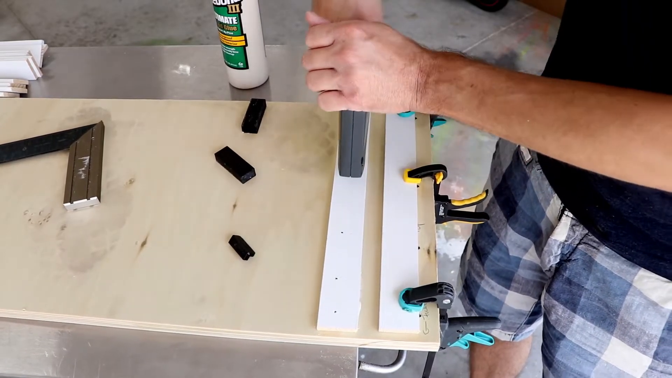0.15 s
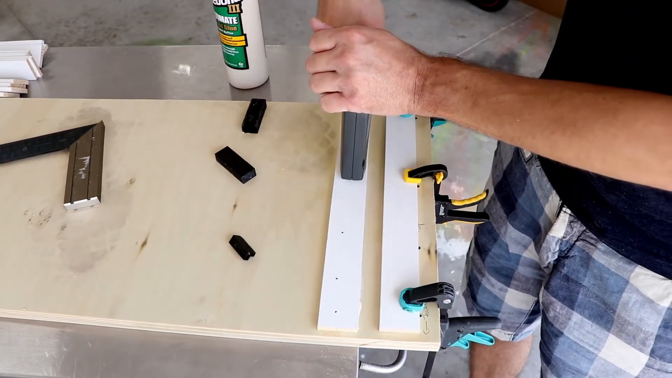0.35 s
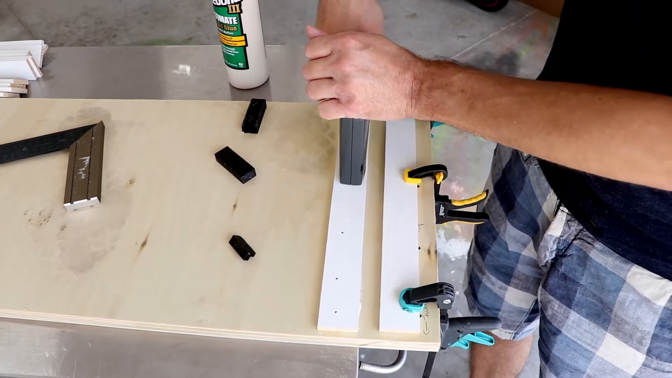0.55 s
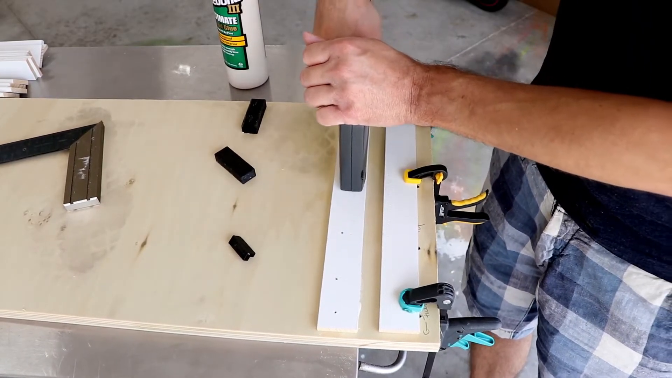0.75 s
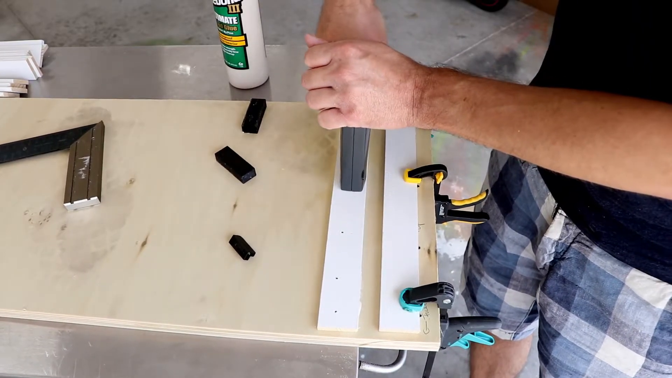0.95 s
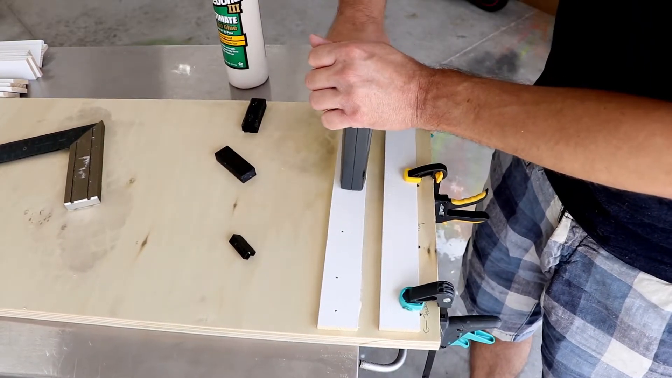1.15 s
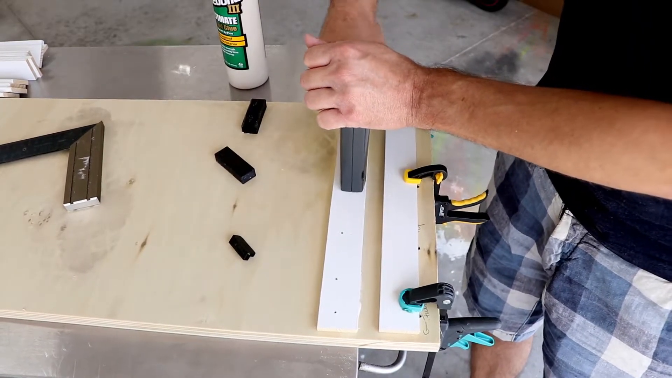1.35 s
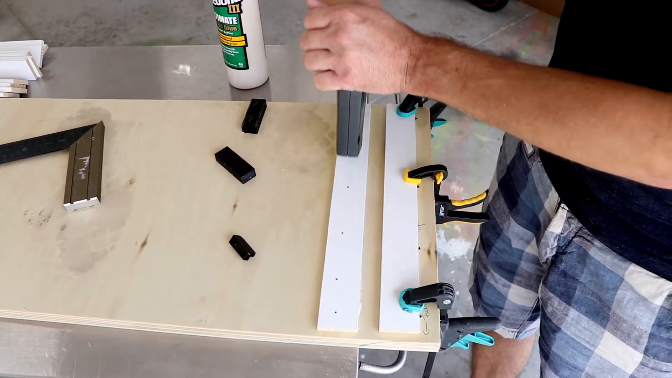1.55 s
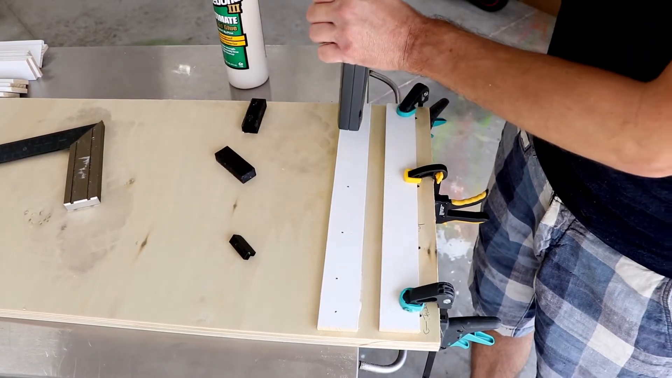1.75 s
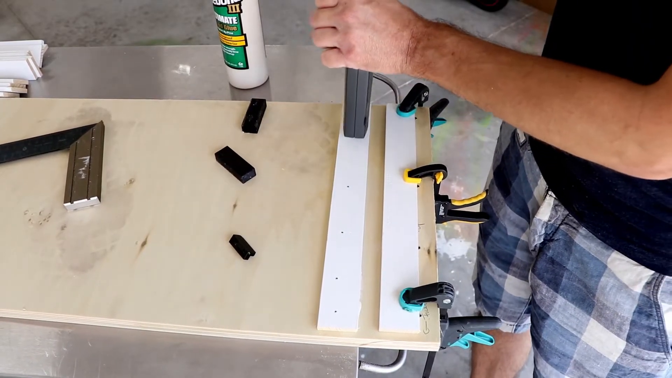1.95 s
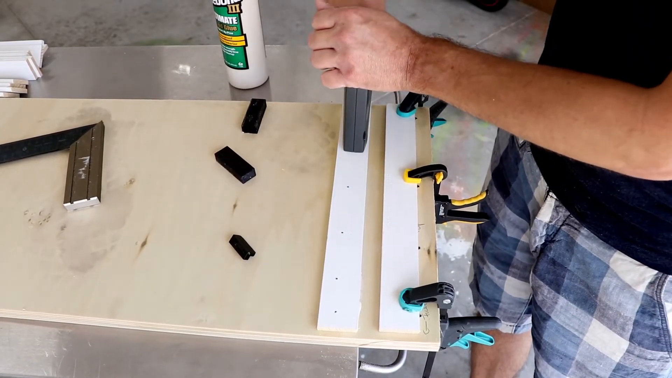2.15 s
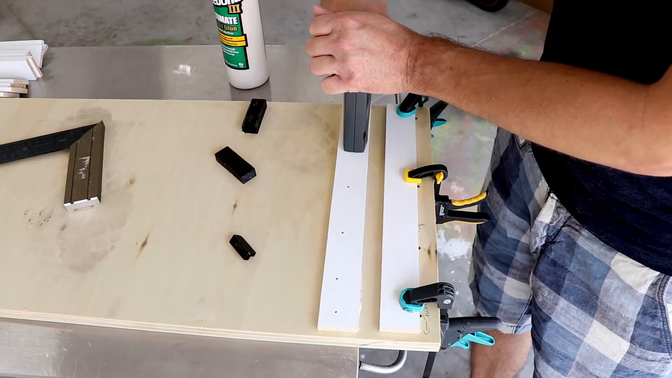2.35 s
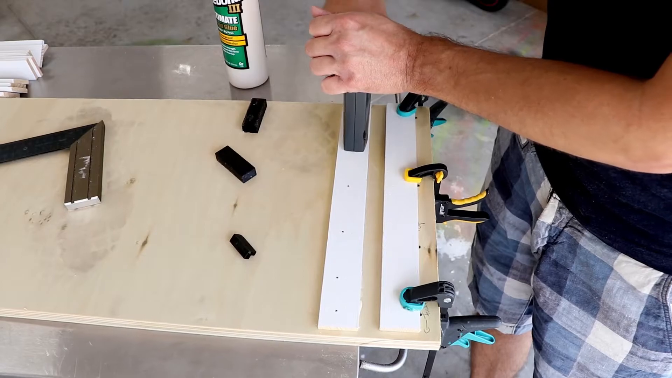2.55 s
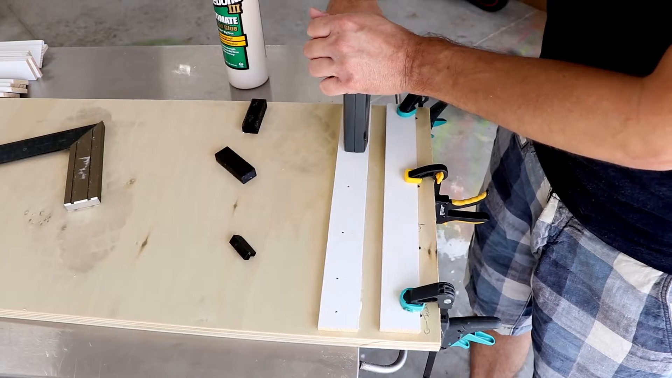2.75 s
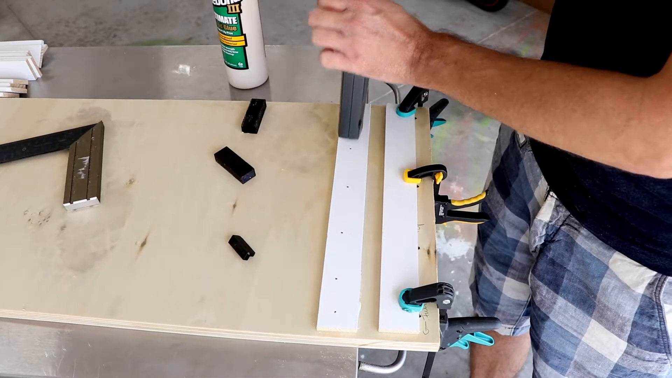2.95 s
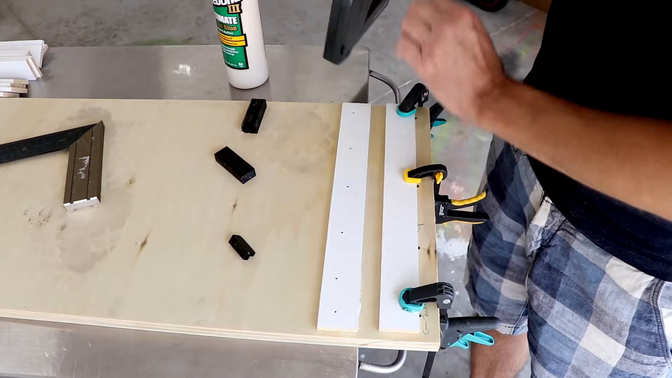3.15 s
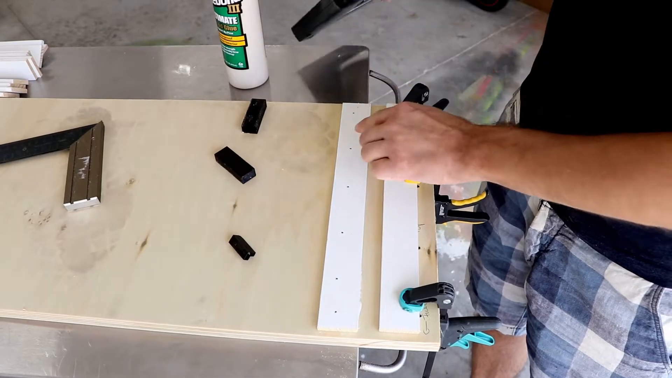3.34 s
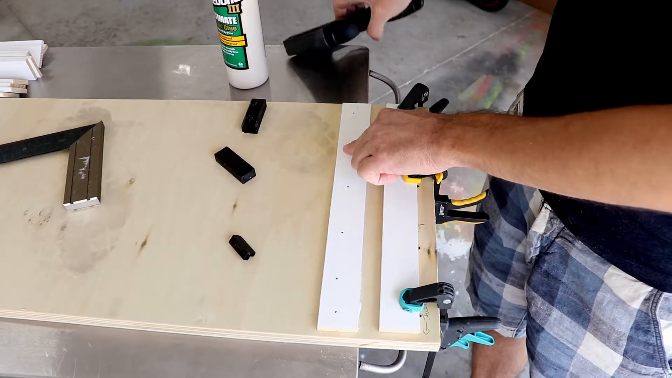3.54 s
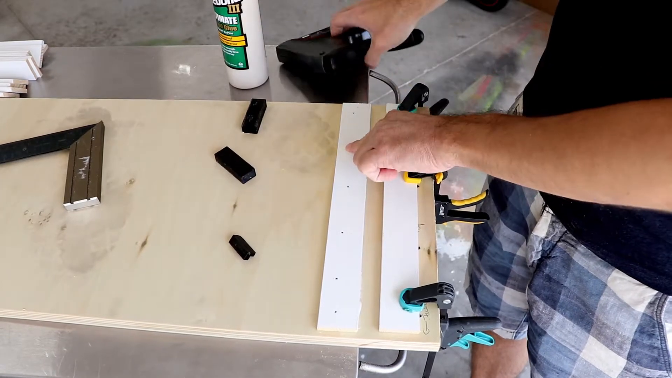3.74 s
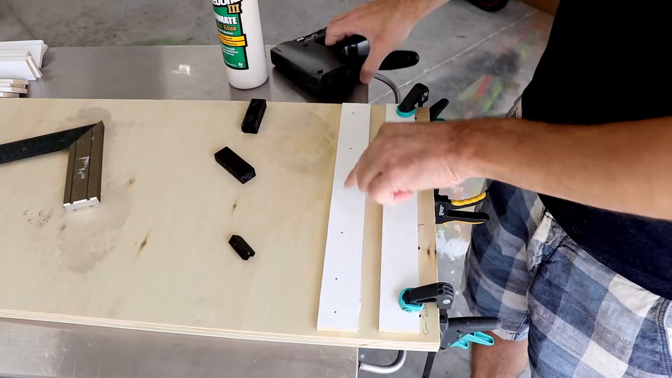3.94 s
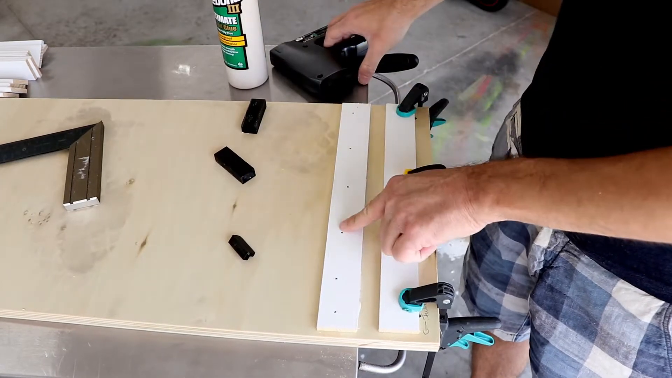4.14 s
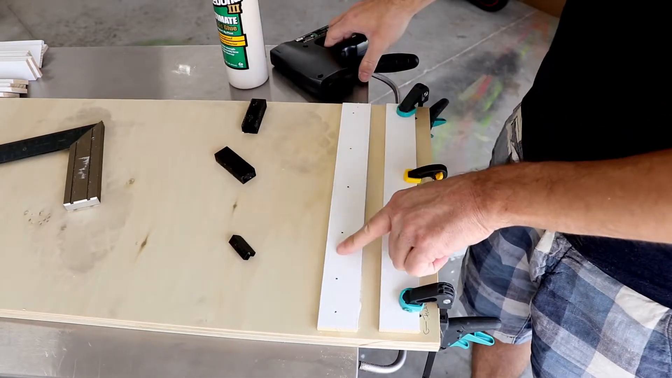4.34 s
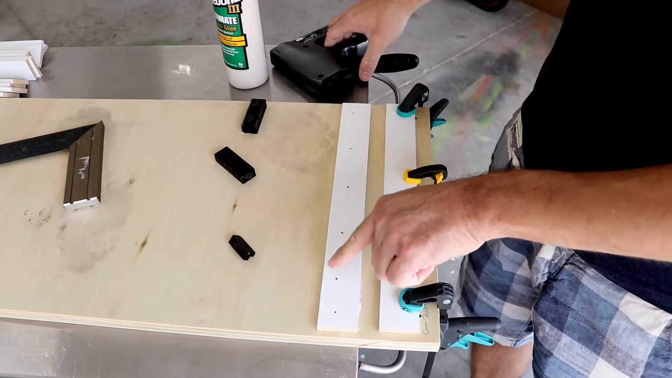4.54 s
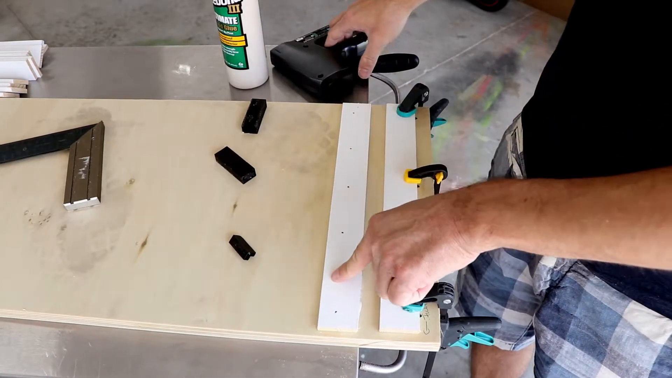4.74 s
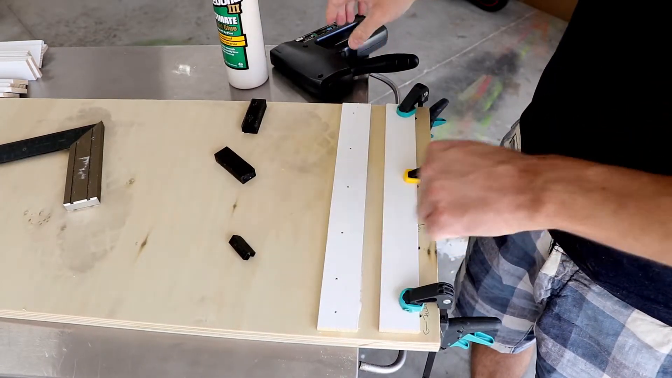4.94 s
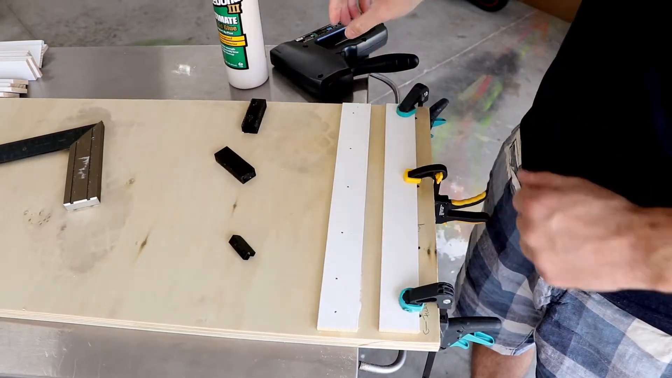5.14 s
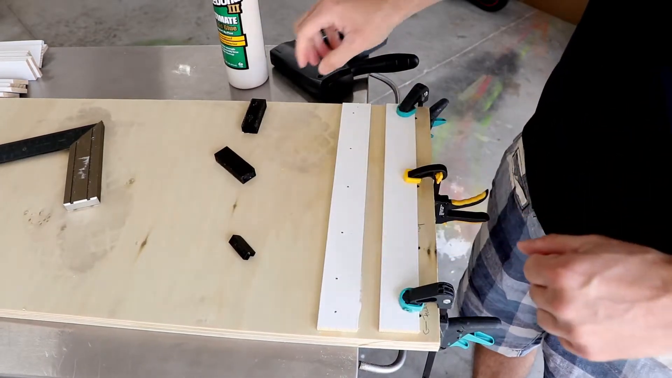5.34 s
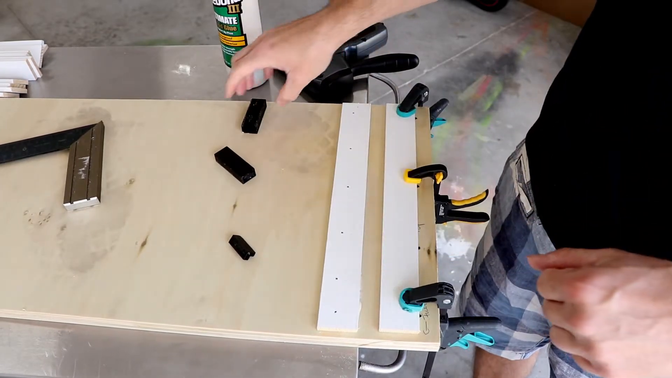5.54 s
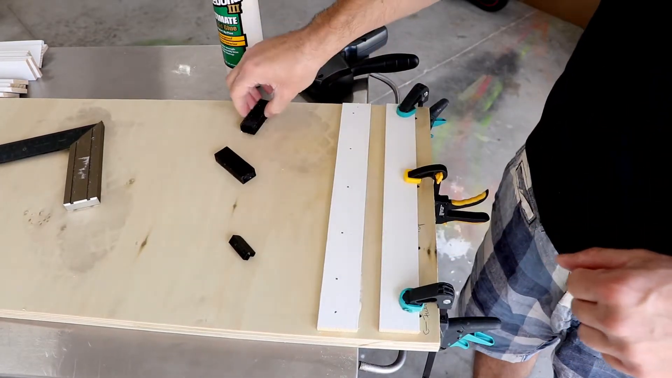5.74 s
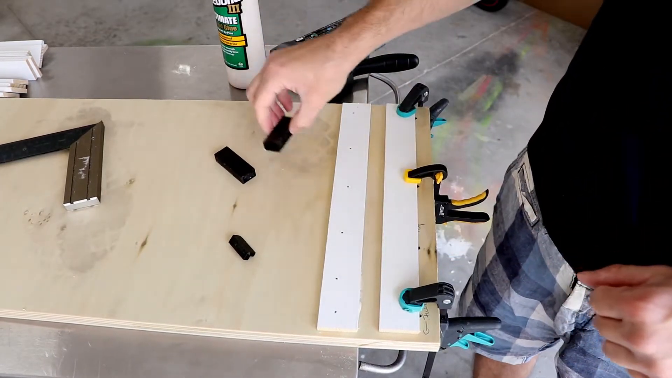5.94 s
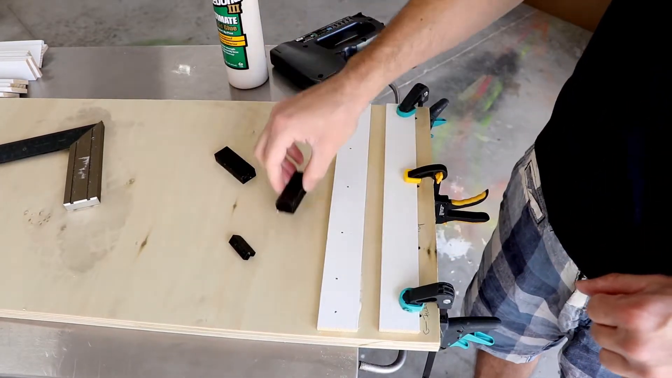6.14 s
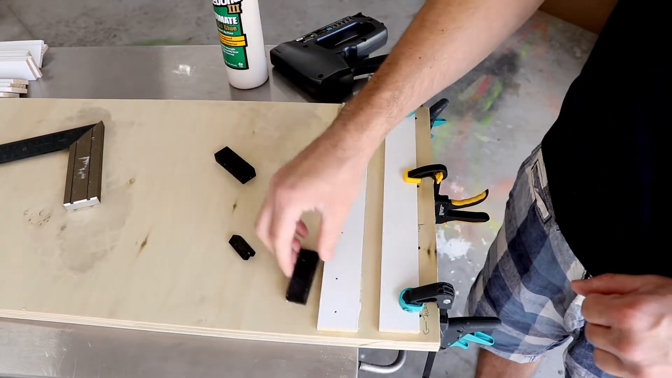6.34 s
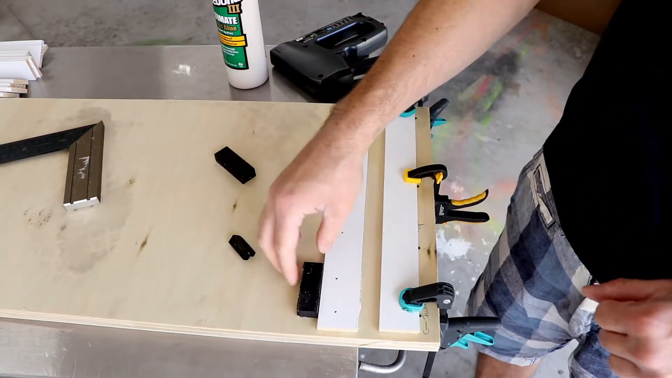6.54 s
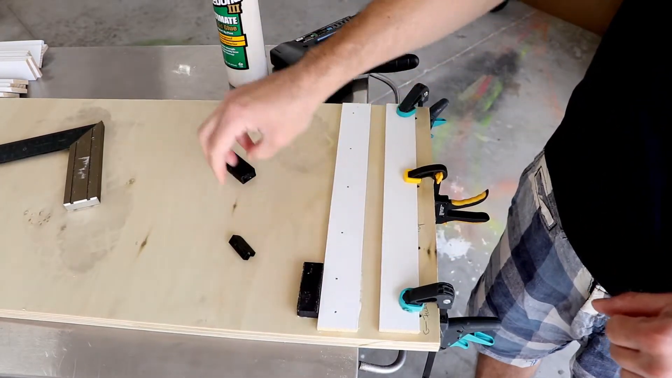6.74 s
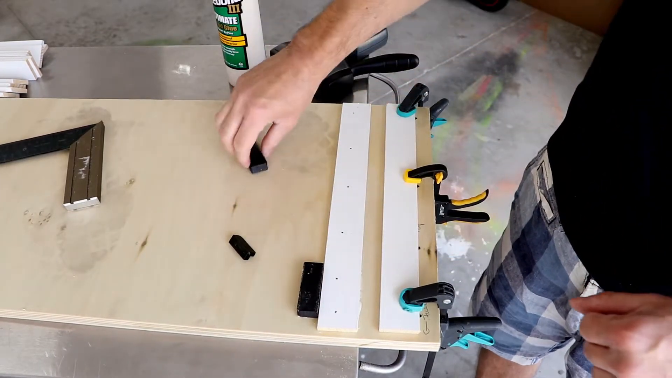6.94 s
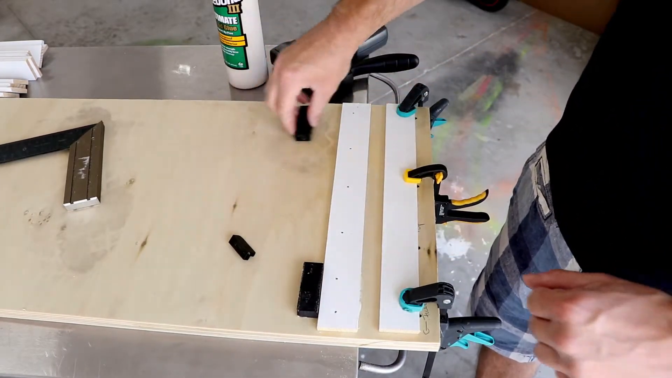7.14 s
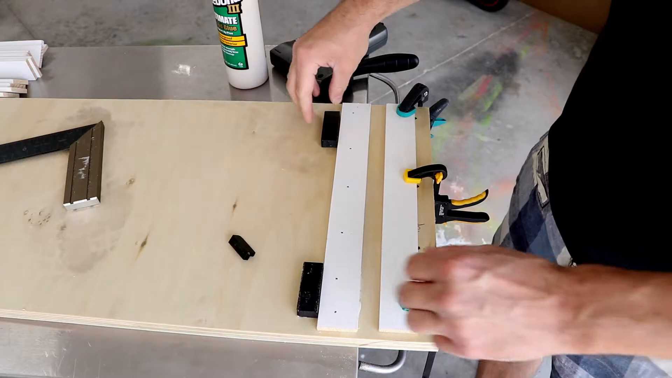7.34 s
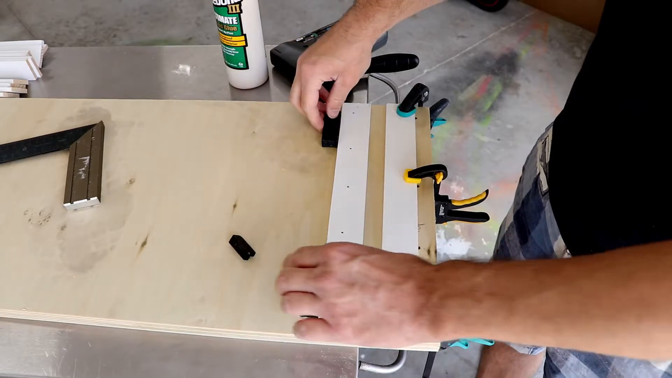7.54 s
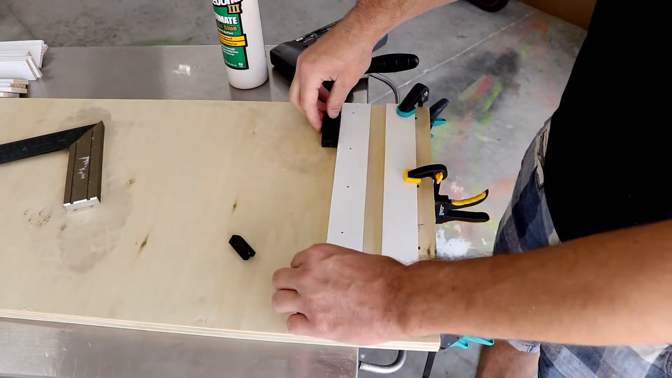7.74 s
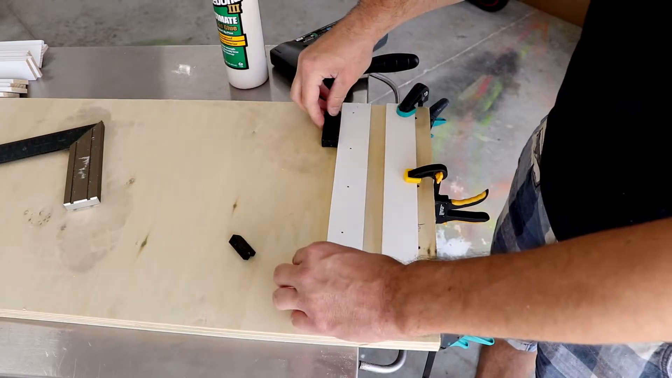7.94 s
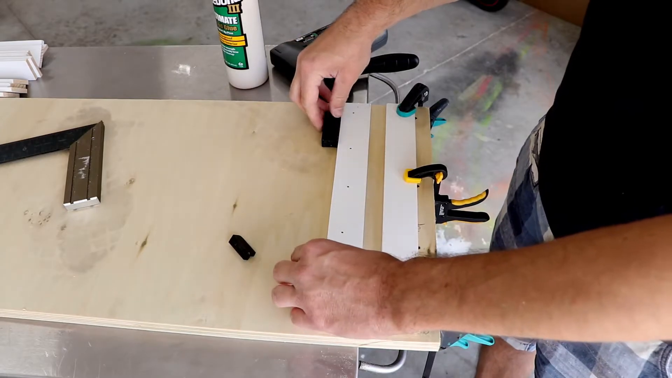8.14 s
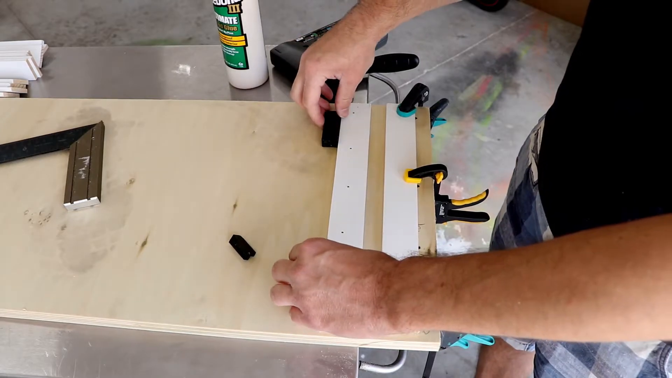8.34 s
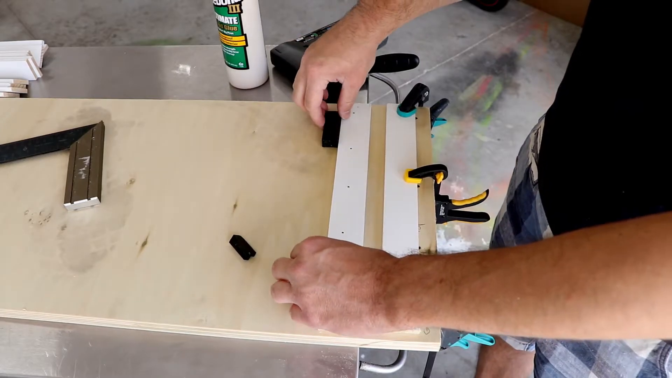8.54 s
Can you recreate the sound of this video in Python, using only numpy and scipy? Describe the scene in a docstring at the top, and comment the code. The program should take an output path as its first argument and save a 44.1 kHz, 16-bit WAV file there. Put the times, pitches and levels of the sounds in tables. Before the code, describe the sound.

Two deafening electric staple gun shots crack and ring through a bare garage, then the gun clunks onto steel and small blocks tap on plywood.

```python
"""The dying ring of a staple shot opens the scene; two more shots follow, so close that the camera overloads.
An electric staple gun drives staples into slats clamped on plywood in a bare garage: filtered noise bursts
crack and decaying sine modes ring the sheet-metal bench. The gun ticks, bumps the work and is laid on the
steel; rubs are gritty noise, squeaks wavering tones, block taps short resonant bursts.
Decaying noise echoes every blow; machines hum faintly in the air."""
import sys
import numpy as np
from scipy import signal
from scipy.fft import rfft, irfft, next_fast_len
from scipy.io import wavfile
from scipy.ndimage import uniform_filter1d, map_coordinates

SR = 44100
rng = np.random.default_rng(int(sys.argv[2]) if len(sys.argv) > 2 else 0)


def int16_out(signal):
    """Quantize to a 16-bit WAV file."""
    q = np.round(np.clip(np.atleast_2d(signal).T, -1, 1) * 32767)
    wavfile.write(sys.argv[1], SR, q.astype(np.int16))


N = 383229
LEAD = SR // 2  # samples before the start, for the shot that is still ringing


def amp(db):
    """Level: decibels to an amplitude ratio."""
    return 10 ** (np.asarray(db) / 20)


def unit(x):
    """Normalisation: scales a signal to an rms of 1."""
    return x / np.sqrt(np.mean(x ** 2) + 1e-20)


def along(points, hz):
    """Spectral envelope: interpolates (frequency, value) points on a log frequency axis."""
    f, v = np.transpose(points)
    return np.interp(np.log(hz + 1), np.log(f + 1), v)


def filtered(x, response):
    """Linear filtering: multiplies the spectrum by a response of frequency."""
    m = next_fast_len(x.shape[-1] + 2048)
    spectrum = rfft(x, m) * response(np.fft.rfftfreq(m, 1 / SR))
    return irfft(spectrum, m)[..., :x.shape[-1]]


def peaks(table, widen, base_db):
    """Resonance: the powers of a body's modes add over a flat base; widen scales every width."""
    def gain(f):
        power = sum(amp(db) ** 2 / (1 + (2 * (f - c) / (widen * w)) ** 2) for c, w, db in table)
        return np.sqrt(amp(base_db) ** 2 + power)
    return gain


def wobble(rate):
    """Slow random modulation: a smooth curve through rate random knots a second."""
    coarse = np.arange(0, N + 64, 64)
    knots = rng.standard_normal(int(N * rate / SR) + 4)
    return np.interp(np.arange(N), coarse, map_coordinates(knots, [coarse * rate / SR]))


# Likeness of the left and right noise.
# Columns: frequency_hz, correlation (no unit)
ALIKE = [(25, .1), (60, .75), (130, .93), (290, 0.84), (640, 0.97), (1400, 0.11), (3000, 0.14)]


def pair(count):
    """Interchannel coherence: two noises, alike in the bass and nearly unrelated in the treble."""
    def split(hz):
        turn = np.arccos(np.clip(along(ALIKE, hz), -1, 1)) / 2
        return [np.cos(turn), np.sin(turn)]
    mid, side = filtered(rng.standard_normal((2, count)), split)
    return np.array([mid + side, mid - side])


def burst(colour, rise, hold, length, focus):
    """Impact noise: a coloured crack rises, holds, then falls 20 dB per length (all in s).

    Focus is the share that left and right have in common."""
    t = np.arange(SR // 12) / SR
    noise = unit(filtered(pair(count=len(t)), colour))
    noise = unit(focus * noise[0] + (1 - focus) * noise)
    swell = np.minimum(t / max(rise, 1e-4), 1)
    decay = amp(-20 * np.maximum(t - rise - hold, 0) / max(length, 5e-4))
    return noise * swell * decay / 2  # peak about 1


# How fast the room dies away.
# Columns: frequency_hz, t60_s
GARAGE = [(100, 2.5), (260, 0.83), (700, 0.57), (1840, 0.48), (4850, 0.46), (12800, 0.33)]
# Colour of the echo from the walls.
# Columns: frequency_hz, level_db
WALLS = [(110, -22), (200, -0.5), (400, -6), (900, 1), (2000, 3.5), (4200, -1.5), (5000, -2.5), (9000, 3),
         (15000, -0.5)]


def garage(seconds):
    """Reverberation: a noise tail builds up, then each frequency dies at its own speed; left energy is 1."""
    hz, t, z = signal.stft(pair(count=int(SR * seconds)), SR, nperseg=256)
    fall_db = 60 * t / along(GARAGE, hz)[:, None]
    linger = amp(-25 - 0.37 * fall_db) * (1 - t / t[-1])  # the far end of the room, faintly
    decay = amp(-fall_db) + linger
    tail = signal.istft(z * amp(along(WALLS, hz))[:, None] * decay, SR, nperseg=256)[1]
    tail = tail * np.clip((np.arange(tail.shape[1]) / SR - .002) / 0.003, 0, 1)
    return tail / np.linalg.norm(tail[0])


# Modes of the plywood and sheet-metal bench, levels before tilt and scatter.
# Columns: pitch_hz, level_db, t60_s
BENCH = [(88, -22, .2), (161, -15.5, 0.22), (206, -9.5, 0.6), (214.6, -24.5, 3.5), (286.7, -7, .5),
         (340.3, -0.5, 0.24), (368, -22.5, 1.1), (401, 4.5, 0.09), (451.3, -5, .3), (472, -22, 1.1),
         (539.6, -5.5, 0.2), (750.2, -10, 0.17), (970, -28, 0.95)]


def bench(tilt, seconds, scatter_db, flutter, slap_db, attack):
    """Modal vibration: a dull slap, then modes of random strength flutter as close neighbours beat with them."""
    t = np.arange(int(SR / 5 * seconds)) * 10 / SR  # at a tenth of the rate, twice as long as seconds
    hz, db, t60 = np.transpose(BENCH)[:, :, None]
    knots = rng.standard_normal((3, len(BENCH), 61))
    drift = np.array([[np.interp(t * 30, np.arange(61), k) for k in mode] for mode in knots[:2]])
    drift = drift * np.minimum(t / 0.039, 1)
    strength_db = db + tilt * np.log2(hz / 400) + scatter_db * knots[2, :, 1:2]
    size = amp(strength_db + 3.5 * flutter * drift[0] - 60 * t / t60)
    apart = 0.18 * knots[2, :, 2:3]  # each mode reaches left and right a little apart
    flip = np.pi * (knots[2, :, 3:4] > 0)  # random polarity
    phase = 2 * np.pi * hz * t + flip + flutter * drift[1]
    ring = np.array([(size * np.sin(phase + side * apart)).sum(axis=0) for side in (1, -1)])
    period = 2 ** (-tilt / 8) / 480
    slap = amp(slap_db) * t / period * np.exp(-1.6 * t / period) * np.sin(2 * np.pi * t / period)
    # the high modes are too dense to tell apart: a band of noise
    band = signal.butter(1, (900, 1350), "band", fs=SR / 10, output="sos")
    sheet = signal.sosfilt(band, rng.standard_normal((2, len(t))))
    sheet = sheet * amp(2.7 * tilt - 10.5 - 60 * t / 1.1)
    knock = ((ring + sheet) * (1 - np.exp(-t / attack)) + slap) / 3
    return signal.resample_poly(knock, 10, 1, axis=1)


def add(out, s, x):
    """Superposition: mixes a stereo sound in at time s."""
    part = out[:, round(s * SR) + LEAD:][:, :x.shape[1]]
    part += x[:, :part.shape[1]]


def blows(rows, colour, knock, rise, hold, focus, wet_db, knock_wet_db):
    """Impact excitation: each contact is a crack and a knock, both answered by the room.

    Rows: start_s, level_db, knock_db over the crack, tilt and knock tilt (dB per octave), length_s, pan_db."""
    out = np.zeros((2, N + LEAD))
    for s, db, knock_db, tilt, knock_tilt, length, pan in rows:
        tint = lambda hz: colour(hz) * amp(tilt * np.log2((hz + 100) / 4000))
        crack = amp(db) * burst(tint, rise, hold, length, focus)
        seconds = np.clip(1 + (db + max(knock_db, 0)) / 50, .22, 1)  # faint blows sink into the air sooner
        thud = amp(db + knock_db) * knock(knock_tilt, seconds)
        add(out, s, crack * amp([[pan / 2], [-pan / 2]]))
        add(out, s, thud)
        room = garage(seconds)
        echo = filtered(room, tint)  # the walls smooth the crack into its mean colour
        echo_gain = amp(wet_db) * np.linalg.norm(crack[0]) / np.linalg.norm(echo[0])
        add(out, s, echo_gain * echo)
        start = thud[:1, :2000] * np.hanning(4000)[2000:]  # only the knock's onset excites the room
        add(out, s, amp(knock_wet_db) * signal.fftconvolve(start, room, axes=1))
    return out[:, LEAD:]


# Staple shots, start_s when the blade lands; leads are times before that, knock_db is over the crack.
# Columns: start_s, level_db, knock_db, switch_lead_s, switch_db, coil_lead_s, coil_db, return_db
SHOTS = [(-.26, -4.5, -11, .03, -40.5, 0.0083, -13, -29.5), (1.216, 5, -15, 0.029, -46.5, .007, -11.5, -29),
         (2.6765, 5.5, -14, .0272, -30.5, 0.01, -14, -19.5)]
# Resonances of the gun body at the blow, widths before widening.
# Columns: pitch_hz, width_hz, level_db
GUN = [(2270, 1300, -1.5), (4090, 250, -1), (6037, 610, -6), (7130, 300, -6.5), (9100, 1400, -5),
       (10800, 190, -8), (12800, 840, -13)]


def shots():
    """Forced impact: the crack swells, holds while the staple sinks and rattles out, and knocks the bench hard."""
    rows = [(s, db, knock_db, 0, 0, .008, -.6) for s, db, knock_db, *_ in SHOTS]
    body = peaks(GUN, widen=1.4, base_db=-18.5)
    colour = lambda hz: body(hz) * hz ** 2 / (hz ** 2 + 900 ** 2)
    knock = lambda tilt, seconds: bench(tilt, seconds, scatter_db=0.47, flutter=0.94, slap_db=20.0, attack=.003)
    return blows(rows, colour, knock, rise=.0025, hold=0.0032, focus=.15, wet_db=-3.5, knock_wet_db=-1.5)


# Spectrum of room air and hiss, relative until scaled to AIR_DB.
# Columns: frequency_hz, level_db (per Hz)
AIR = [(12, -40), (20, -19), (64, -2.5), (87, -6.5), (155, -7.5), (188, -7.5), (385, -9), (633, -13.5),
       (1130, -17), (1230, -17.5), (2080, -23), (2900, -25), (4760, -34), (8060, -31.5), (14800, -37)]
# Faint machine hums, levels relative.
# Columns: pitch_hz, level_db
HUM = [(59.2, -70), (156.1, -72), (1249, -83.5), (2186, -92.5), (2492, -89)]
AIR_DB = -62  # rms level of the noise


def air():
    """Stationary noise: flickering room air and microphone hiss, with faint wavering hums."""
    z = signal.stft(pair(count=N + 512), nperseg=512)[2]
    field = uniform_filter1d(rng.standard_normal(z.shape[1:]), size=4, axis=0)
    field = uniform_filter1d(field, size=14, axis=1)
    noise = signal.istft(z * amp(.9 * unit(field)), nperseg=512)[1][:, :N]
    t = np.arange(N) / SR
    hum = sum(amp(db + 2.5 + 4.2 * wobble(7.7)) * np.sin(2 * np.pi * hz * t + 3.4 * wobble(15))
              for hz, db in HUM)
    colour = lambda hz: amp(along(AIR, hz)) / (1 + (hz / 14500) ** 24)
    return amp(AIR_DB) * unit(filtered(noise, colour)) + hum


# The gun is handled and bumps the work; knock_db is over the tick.
# Columns: start_s, level_db (peak), knock_db, tilt (dB per octave)
TICKS = [(0.297, -55.5, 5, 0), (0.463, -54, 10, -6), (0.525, -42.5, 5, -10.5), (0.996, -47.5, -9.5, -3),
         (1.046, -44, -16, 6), (2.151, -61, 19.5, -2.5), (2.385, -49, -18, -2.5), (2.401, -45.5, -11, -2.5),
         (2.448, -47, -14, 8), (2.598, -53, -10, -9), (3.372, -43, -8, -6)]
# The gun is laid on the steel, rocks and settles.
# Columns: start_s, level_db (peak), knock_db, tilt (dB per octave), knock_tilt (dB per octave)
LANDINGS = [(3.5758, -15.5, -13, -1.5, -5), (3.808, -48.5, 5, -5, -4), (3.947, -50.5, -5.5, -7, .5),
            (4, -31, -20, -4, 6.5), (4.008, -32, -14.5, -1, -5), (4.02, -22.5, -29.5, 1, -8.5),
            (4.0229, -24.5, -1, -6, 2.5), (4.031, -25.5, -16.5, 1, 1), (4.0506, -22.5, -13.5, -6.5, 5.5),
            (4.066, -34, -3.5, -1, 5.5)]
# Spectrum of a tick of the housing.
# Columns: frequency_hz, level_db
HOUSING = [(500, -30), (900, -10), (1500, -1), (3500, 2), (5000, -3.5), (9000, -3.5), (12000, -8.5),
           (16000, -18)]
RETURN_S = .2237  # the blade springs back this long after the blow
SWITCH_TILT, COIL_TILT, RETURN_TILT = 4.5, .1, -0.5  # dB per octave
INNER_KNOCK_DB = -23  # inner parts barely move the bench
KNOCK_TILT, DULLER_PER_DB = -0.3, 0.3367  # dB per octave; a heavier knock is duller


def ticks():
    """Light contact: switch, coil and returning blade around each shot, and the gun on work and bench."""
    contacts = []
    for s, _, _, switch_s, switch_db, coil_s, coil_db, return_db in SHOTS:
        contacts += [(s - switch_s, switch_db, INNER_KNOCK_DB, SWITCH_TILT),
                     (s - coil_s, coil_db, INNER_KNOCK_DB, COIL_TILT),
                     (s + RETURN_S, return_db, INNER_KNOCK_DB, RETURN_TILT)]
    rows = [(s, db, knock_db, tilt, KNOCK_TILT - DULLER_PER_DB * knock_db, .0035, -1.5)
            for s, db, knock_db, tilt in contacts + TICKS]
    rows += [(*row, .0035, -1.5) for row in LANDINGS]
    colour = lambda hz: amp(along(HOUSING, hz))
    knock = lambda tilt, seconds: bench(tilt, seconds, scatter_db=2.2, flutter=.9, slap_db=26, attack=.002)
    return blows(rows, colour, knock, rise=0.00032, hold=0, focus=1.0, wet_db=1.0, knock_wet_db=0.5)


# Short rubs on plywood and steel; body_db is over the hiss, half length is to 1/e.
# Columns: middle_s, hiss_db, body_db, half_length_s
SLIDES = [(1.05, -68.5, 9, 0.0086), (5.18, -72, -19, .04), (5.715, -65.5, -0.5, 0.021),
          (6.78, -65.5, -23, 0.036), (6.965, -58.5, 0.5, 0.021), (7.065, -49, -3, 0.013),
          (7.106, -60, 0, 0.014), (7.214, -50, 0.5, 0.016)]
# Resonances of a block on plywood, for rubs and taps, widths before widening.
# Columns: pitch_hz, width_hz, level_db
BLOCK = [(420, 60, -3.5), (540, 34, -6.5), (982.8, 99, -9.5), (1120, 260, -9.5), (2315, 620, -6.5),
         (3440, 700, -3), (5643, 400, -10.5), (7860, 960, 3.5)]


def slides():
    """Friction noise: each rub swells and fades as gritty noise in the block's resonances."""
    out, t = np.zeros((2, N + LEAD)), np.arange(SR // 4) / SR
    body = peaks(BLOCK, widen=2.1, base_db=-15.5)
    high = lambda hz: body(hz) * hz ** 4 / (hz ** 4 + 2800.0 ** 4)
    hollow = peaks(BLOCK[:5], widen=.9, base_db=-24)
    low = lambda hz: hollow(hz) * hz ** 2 / (hz ** 2 + 400 ** 2) / (1 + (hz / 2200) ** 4)
    middle = t[-1] / 2
    for s, db, body_db, half in SLIDES:
        # the grit steps to a new random level every 64 samples
        grit = amp(0.84 * np.repeat(rng.standard_normal(len(t) // 64 + 1), 64)[:len(t)])
        hiss = unit(filtered(pair(count=len(t)), high))
        noise = hiss + amp(body_db) * unit(filtered(pair(count=len(t)), low))
        rub = amp(db) * grit * noise * np.exp(-((t - middle) / half) ** 2)
        add(out, s - middle, rub)
        add(out, s - middle, amp(-11.5) * signal.fftconvolve(rub[:1], garage(.3), axes=1))
    return out[:, LEAD:]


# Faint squeaks, levels before the wobble; half length is to 1/e.
# Columns: middle_s, pitch_hz, level_db, half_length_s
SQUEAKS = [(3.53, 2040, -71, 0.03), (5.25, 1330, -65, .03), (5.317, 1320, -68, 0.016),
           (6.33, 4120, -82, .06), (8.1, 4130, -83, .2)]


def squeaks():
    """Phase and amplitude modulation: short wavering tones, as of rubber or a spring under load."""
    t, out = np.arange(N) / SR, 0
    for s, hz, db, half in SQUEAKS:
        level = amp(db + 3.7 * wobble(43)) * np.exp(-((t - s) / half) ** 4)
        out = out + level * np.sin(2 * np.pi * hz * t + 1.6 * wobble(50))
    return out


# Small blocks tapped down; knock_db is over the click.
# Columns: start_s, level_db (peak), knock_db, tilt (dB per octave)
TAPS = [(6.403, -24.5, -15.5, -5.5), (6.4089, -12.5, -23.5, -5), (6.4395, -26.5, -16, -9.5),
        (6.754, -46, -21, 3), (6.975, -46.5, 3.5, -3), (6.992, -37.5, -10.5, 0), (7.058, -48.5, 0.5, -7),
        (7.194, -45.5, -5, -7.5), (7.199, -33.5, -15, -9.5), (7.251, -44, -12.5, -5), (7.263, -43, -14, 4),
        (7.548, -41.5, -4, -7)]
TAP_S, TAP_LONGER = .0015, 0.15  # length at no tilt; doublings per dB per octave of dullness
TAP_PAN_DB = -5  # left over right


def taps():
    """Struck resonator: a block clicks and gives a short hollow knock."""
    rows = [(s, db, knock_db, tilt, 0, TAP_S * 2 ** (-TAP_LONGER * tilt), TAP_PAN_DB)
            for s, db, knock_db, tilt in TAPS]
    body = peaks(BLOCK, widen=.9, base_db=-22)
    colour = lambda hz: body(hz) * hz ** 2 / (hz ** 2 + 1500 ** 2)
    hollow = peaks(BLOCK[:4], widen=0.58, base_db=-47)
    knock = lambda tilt, seconds: burst(hollow, rise=0.0016, hold=0, length=0.024, focus=0.66)
    return blows(rows, colour, knock, rise=0.00048, hold=0, focus=1.0, wet_db=-6.5, knock_wet_db=-3.5)


def scene():
    """Superposition: all sources sound together."""
    return shots() + air() + ticks() + slides() + squeaks() + taps()


TOP_HZ = 15770  # band limit, inside a slope 400 Hz wide


def record(dry):
    """Saturation and band limiting: the camera clips near full scale; the sound stops above a band limit."""
    clipped = dry / (1 + np.abs(dry / .98) ** 8) ** (1 / 8)
    return filtered(clipped, lambda hz: np.sin(np.pi / 2 * np.clip((TOP_HZ + 150 - hz) / 400, 0, 1)) ** 2)


dry = scene()
out = record(dry)
int16_out(out)
```